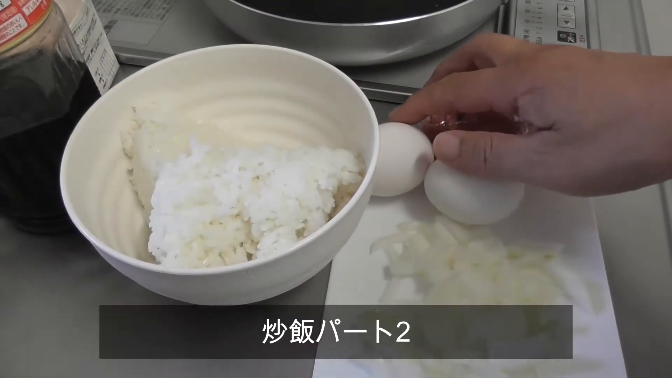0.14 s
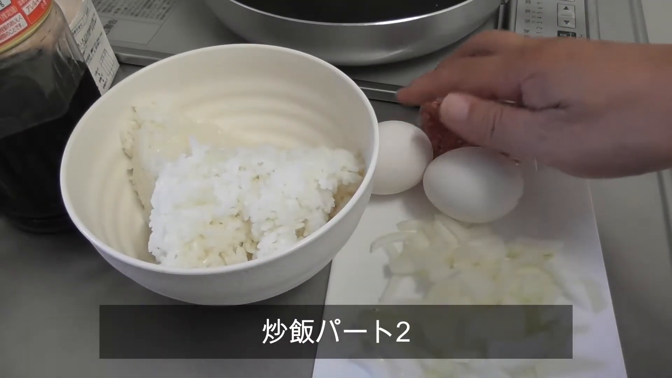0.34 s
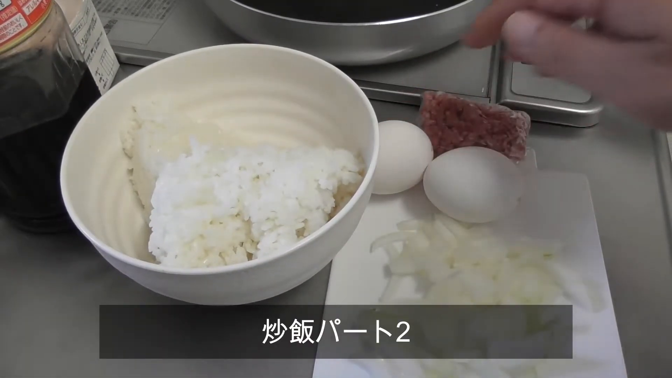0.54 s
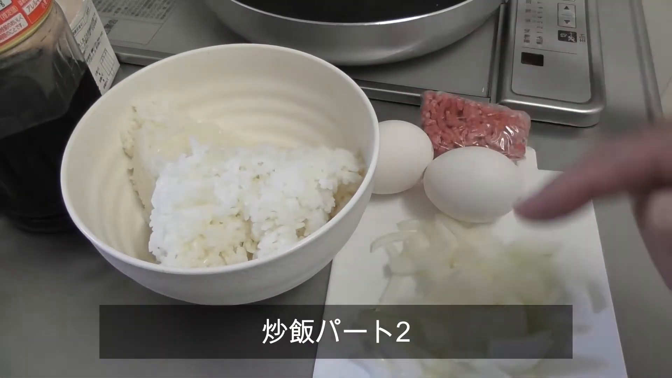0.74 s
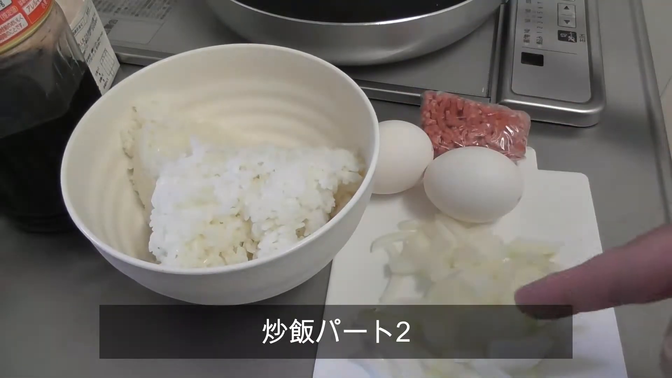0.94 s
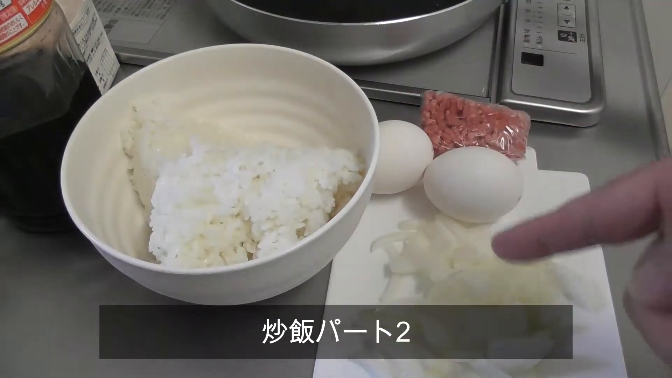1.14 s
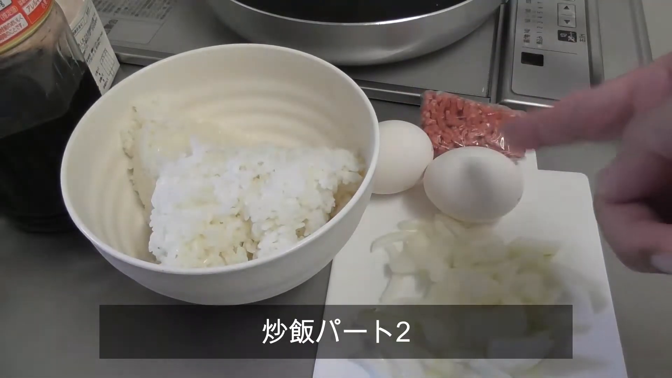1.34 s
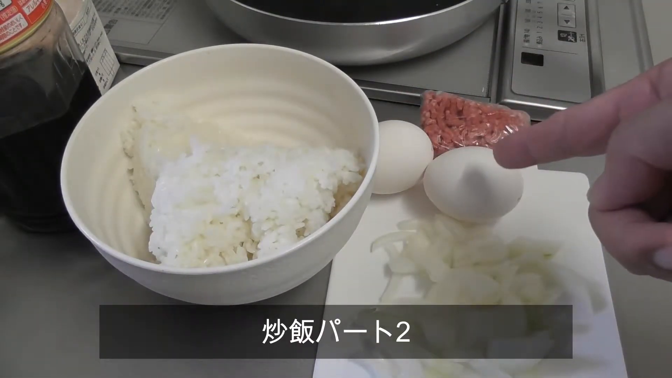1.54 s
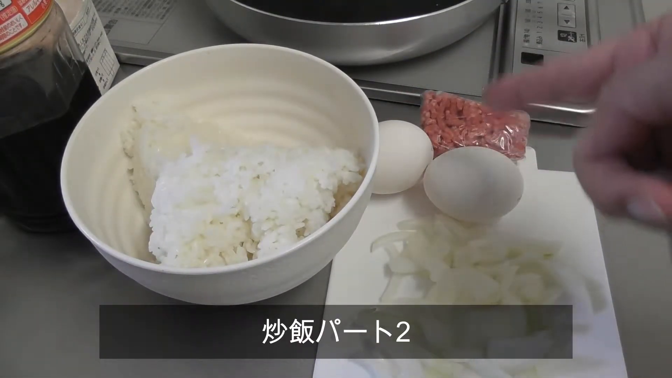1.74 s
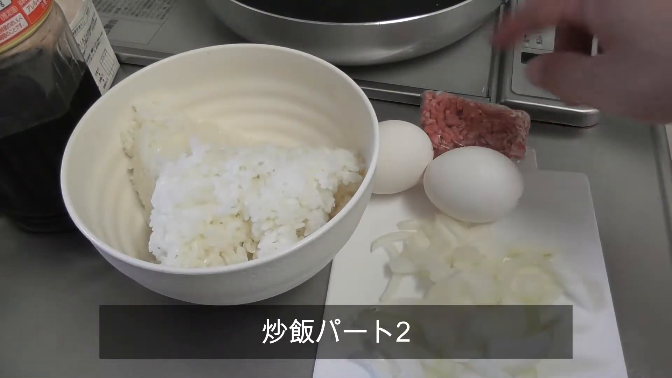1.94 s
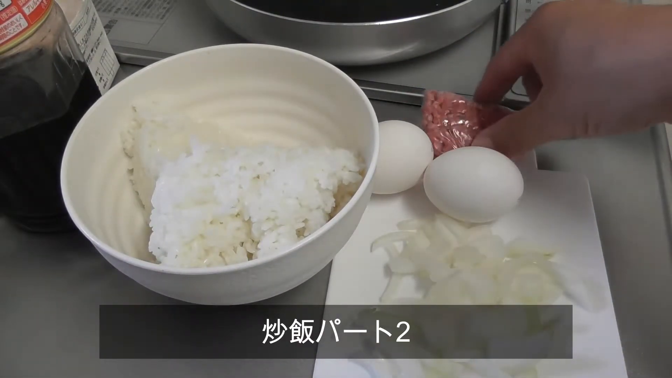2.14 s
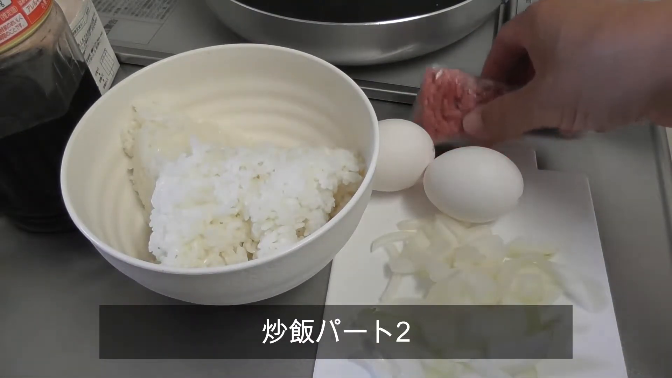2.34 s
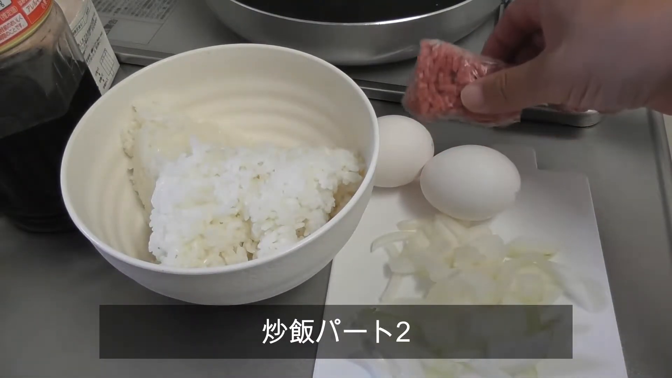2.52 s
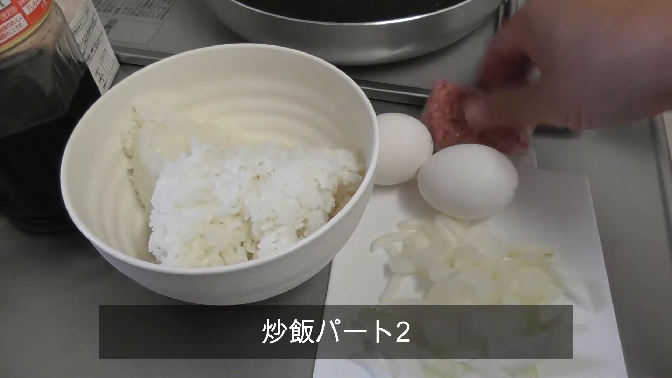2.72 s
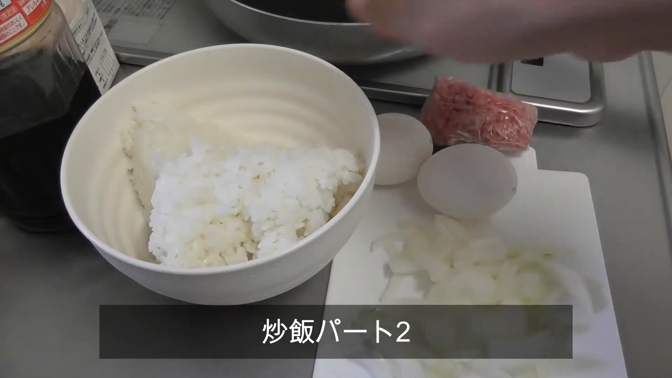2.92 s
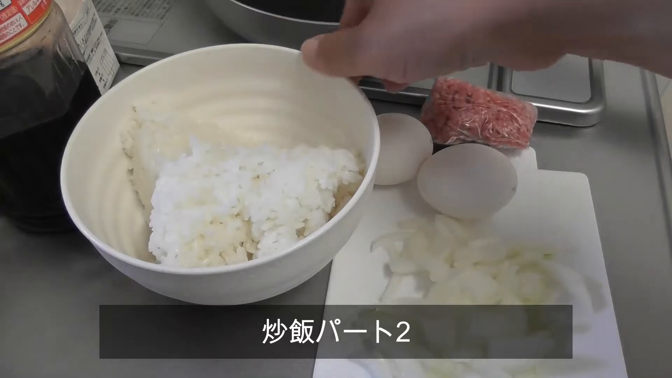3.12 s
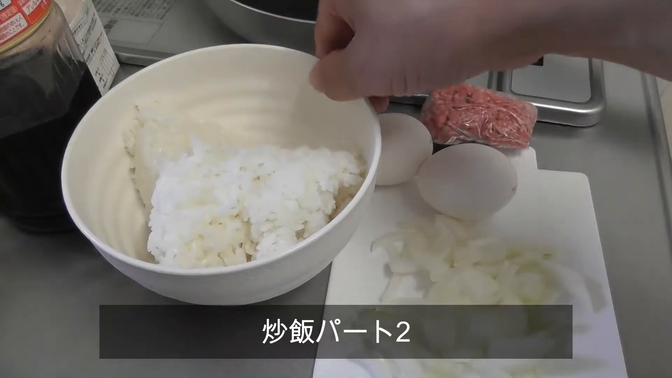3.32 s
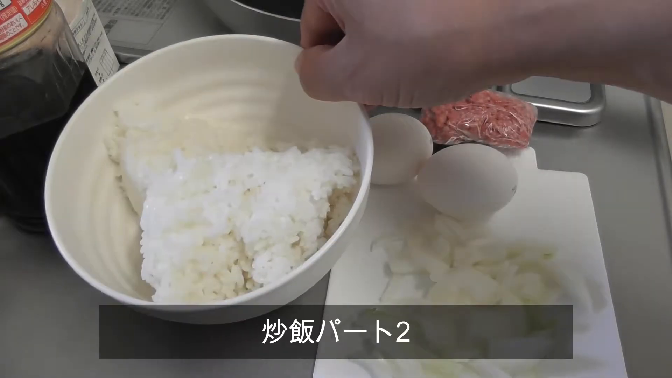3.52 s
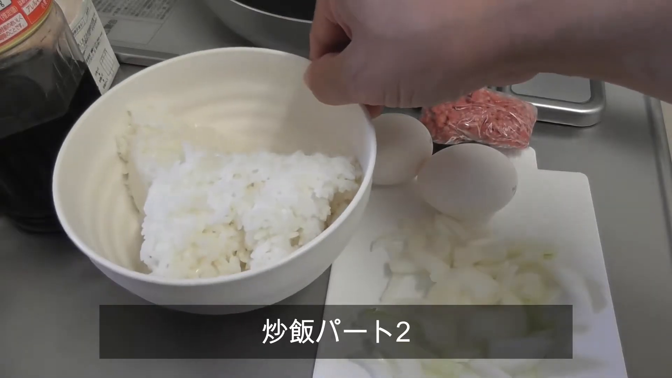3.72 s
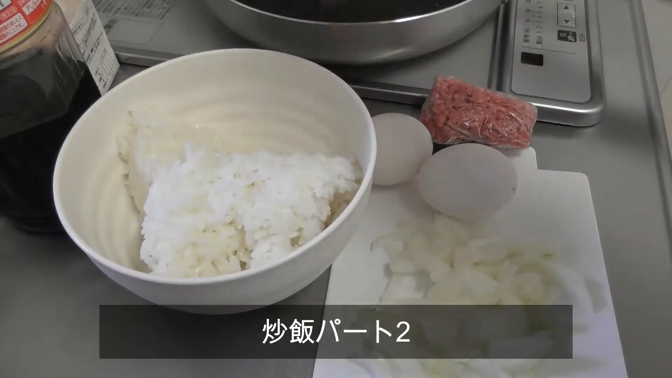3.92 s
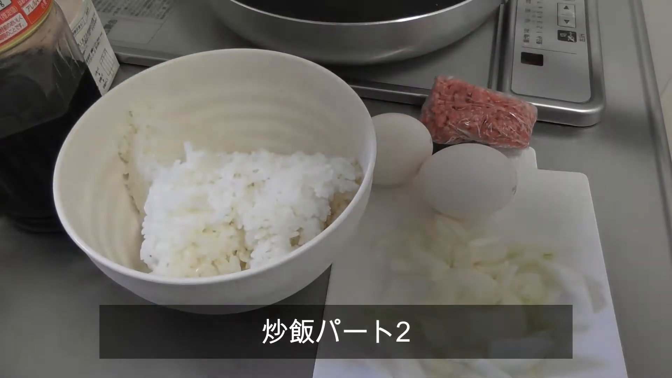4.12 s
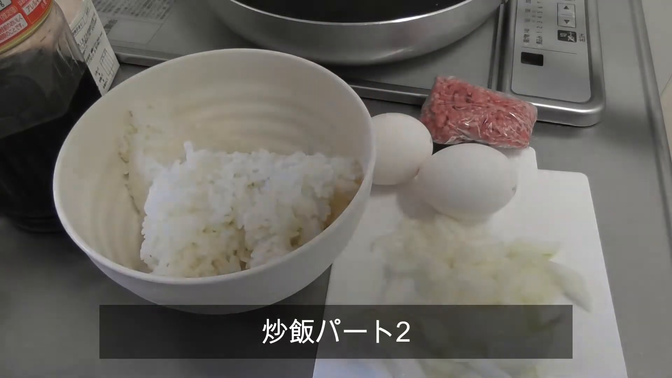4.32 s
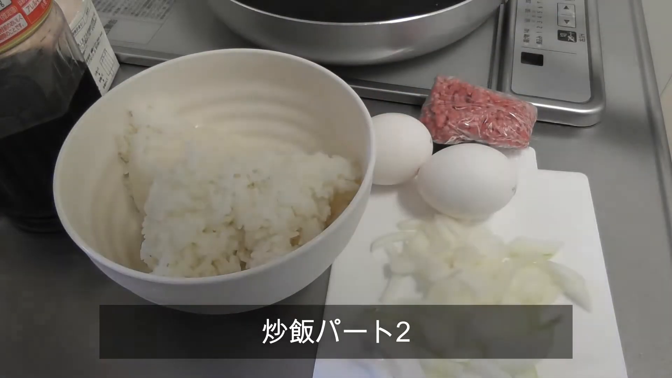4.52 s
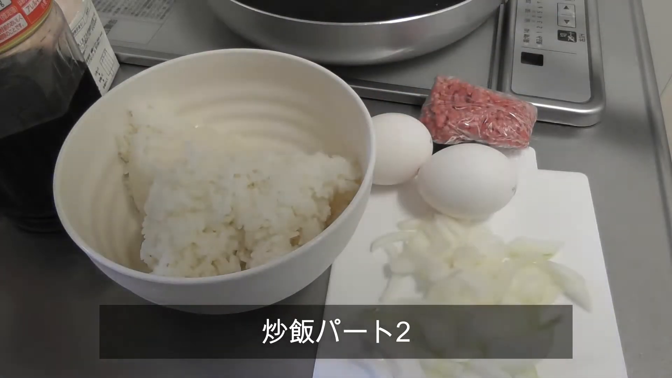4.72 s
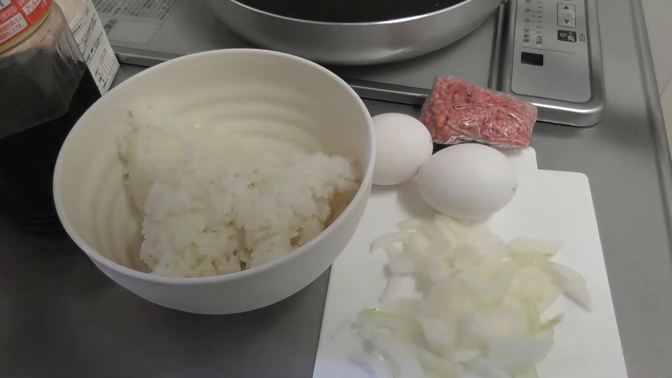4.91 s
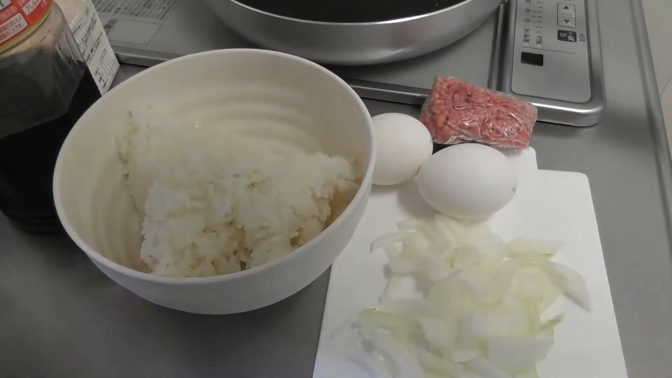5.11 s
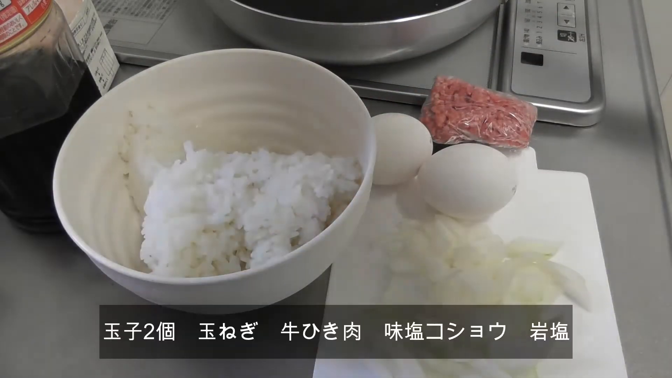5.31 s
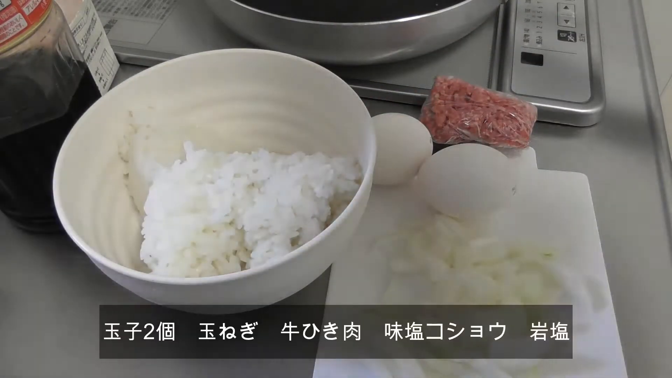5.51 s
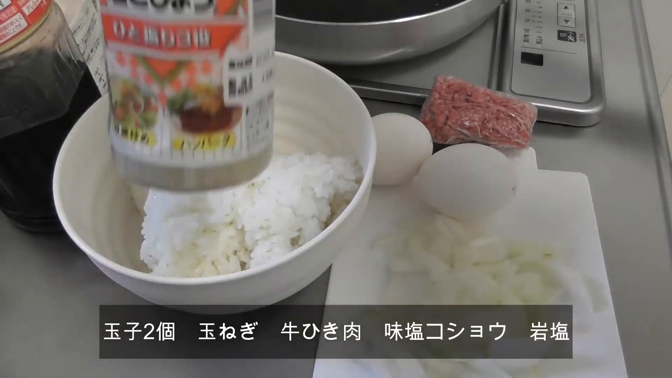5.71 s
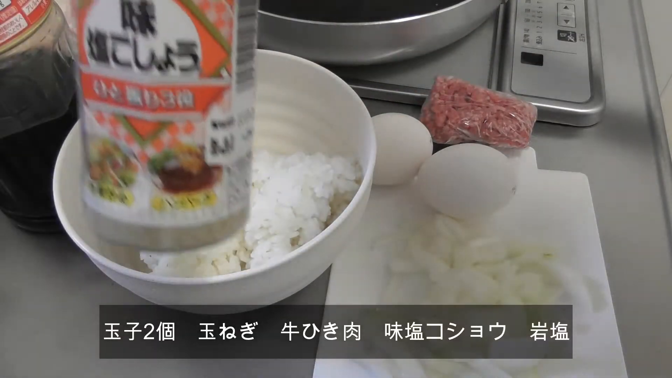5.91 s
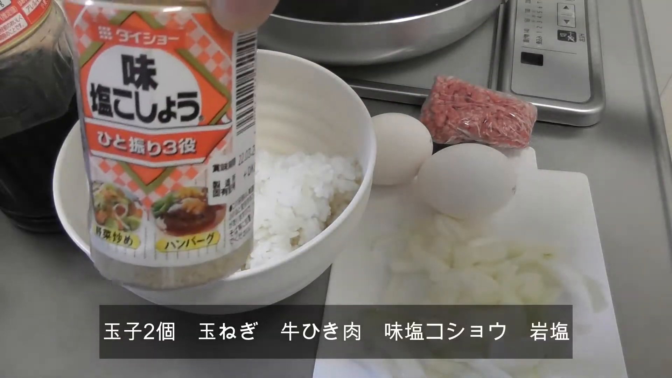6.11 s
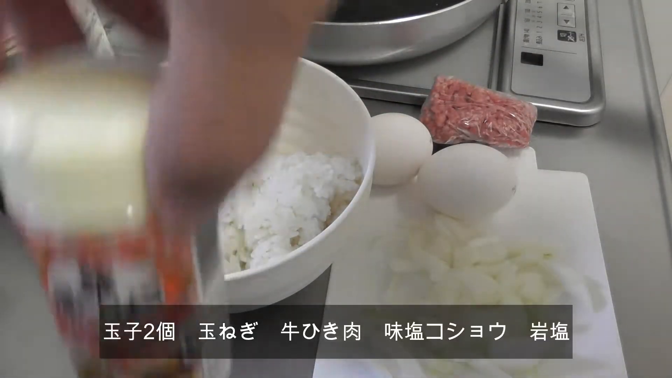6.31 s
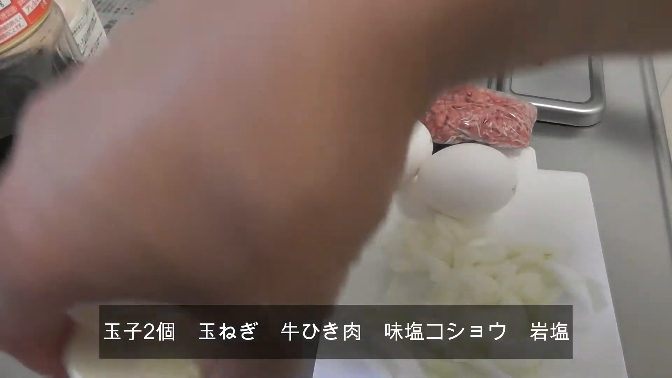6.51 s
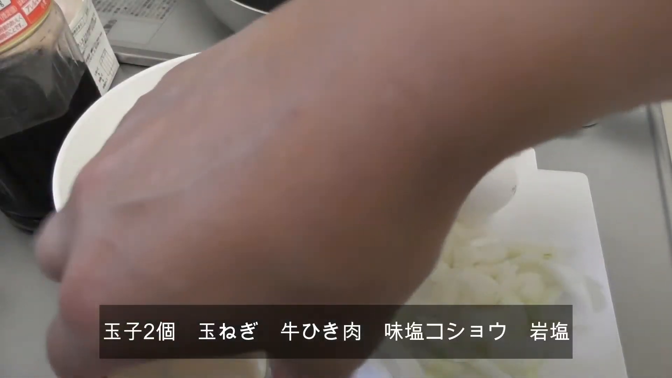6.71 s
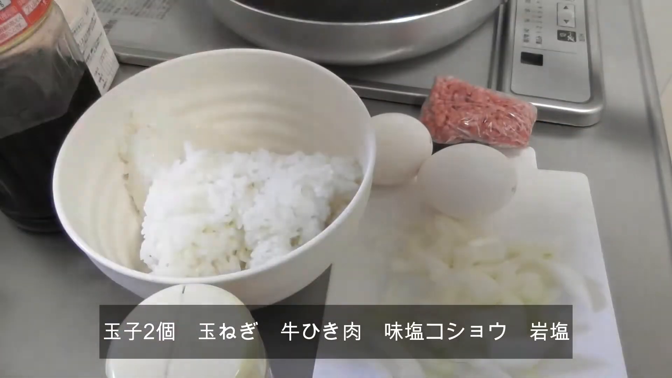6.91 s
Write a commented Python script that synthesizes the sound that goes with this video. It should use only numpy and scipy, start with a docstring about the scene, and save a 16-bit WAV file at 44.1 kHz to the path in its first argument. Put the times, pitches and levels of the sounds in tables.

```python
"""At a steel kitchen counter in a small room, a hand lifts and drops a film-wrapped pack, tips and sets down a bowl,
drags a plastic shaker off the counter and knocks it down again near the microphone.
Knocks and drags make the bowl and counter ring; friction is shaped noise; film and snaps are short bursts.
Behind them are the steady tones of two appliance motors, faint whines and the shaped noise of the air."""
import sys
import numpy as np
from scipy import signal
from scipy.fft import rfft, irfft
from scipy.io import wavfile

SR = 44100
rng = np.random.default_rng(int(sys.argv[2]) if len(sys.argv) > 2 else 0)


def persist_wave(psi):
    """Save psi, clipped to +-1, as 16-bit WAV."""
    counts = np.round(np.clip(psi, -1, 1) * 32767).astype(np.int16)
    wavfile.write(sys.argv[1], SR, np.atleast_2d(counts).T)


N = 306539

# ways the counter top rings when nothing damps it: (pitch [Hz], level [dB], time to fall 60 dB [s])
COUNTER_MODES = [(102.5, 0, 0.14), (125.5, -0.5, 0.071), (180, -20, 0.015), (221, -9, 0.11),
                 (275, -26.5, 0.29), (298.6, 1, 0.028), (353, -6.5, 0.077), (460.6, -6, 0.11),
                 (486, -1, 0.037), (625, -3.5, 0.037), (719.5, -10.5, 0.099), (855, -7, 0.053),
                 (950, -13, 0.12), (1068.5, -8, 0.062), (1270, -10, 0.053), (1457, -8.5, 0.028),
                 (1860, -17.5, 0.038)]
ROOM_DB = -14   # echoes against the direct sound


def amp(db):
    """Turn decibels into a gain."""
    return 10 ** (np.asarray(db, float) / 20)


def rms_one(x):
    """Scale a sound to an average (rms) strength of 1."""
    return x / np.sqrt(np.mean(x ** 2) + 1e-20)


def colour(x, points):
    """Filter a sound to a curve of (pitch [Hz], gain [dB]), responding as early as possible (minimum phase)."""
    points = np.array(points)
    hz = np.maximum(np.arange(4097) * SR / 8192, 1)
    db = np.interp(np.log(hz), np.log(points[:, 0]), points[:, 1])
    # folding the cepstrum (spectrum of the log gain) forward makes the response minimum phase
    cepstrum = irfft(np.log(amp(db)))
    cepstrum[1:4096] *= 2
    kernel = irfft(np.exp(rfft(cepstrum[:4097], 8192)))
    return signal.oaconvolve(x, kernel[:3000])[:len(x)]


def drift(rate):
    """A slow random curve: straight lines between random points, rate points per second (at most 39)."""
    knots = rng.standard_normal(int(N / SR * 40) + 2)
    return np.interp(np.arange(N) / SR * min(rate, 39), np.arange(len(knots)), knots)


def ring(clicks, hz, t60):
    """A resonance: each click starts a sine of its own height that falls 60 dB in t60 seconds."""
    r = amp(-60 / (t60 * SR))
    w = 2 * np.pi * hz / SR
    return signal.lfilter([0, np.sin(w)], [1, -2 * r * np.cos(w), r * r], clicks + 1e-18)


def drive_db(mode_hz, contact_hz, below=3.3, above=3.16):
    """A contact drives modes less the farther they lie from its own pitch (dB per octave squared)."""
    octaves = np.log2(mode_hz / contact_hz)
    return -np.where(octaves > 0, above, below) * octaves ** 2


def burst(hz, t60, noise, width=0.85):
    """A sharp edge and a short dying rattle around one pitch, peak 1; width is in octaves to each side."""
    hz = np.clip(hz, 500, 14000)
    band = signal.butter(1, [hz / 2 ** width, min(hz * 2 ** width, .45 * SR)], "band", fs=SR)
    rattle = 0.47 * noise * amp(-60 * np.arange(len(noise)) / SR / max(t60, .002))
    rattle[0] = 1   # the sharp edge
    x = signal.lfilter(*band, rattle)
    return x / np.abs(x).max()


def add(track, sound, s):
    """Mix a sound into a track at time s."""
    i = round(s * SR)
    track[i:i + len(sound)] += sound[:N - i]


def strokes(table, rise, fall):
    """Strokes rise, hold and fall in dB per second; the loudest one sets the level and the extra columns."""
    start, length, db, *columns = np.transpose(table)
    t = np.arange(N)[:, None] / SR
    early = np.maximum(start - t, 0)
    late = np.maximum(t - start - length, 0)
    levels = db - rise * early - fall * late
    loudest = levels.argmax(axis=1)
    return np.maximum(levels.max(axis=1), -99), *[c[loudest] for c in columns]


def soften(x, low_hz=85, high_hz=2500):
    """A small body radiates no deep bass, and a contact of finite length no treble."""
    return signal.sosfilt(signal.butter(2, [low_hz, high_hz], "band", fs=SR, output="sos"), x)


def air():
    """The air of the room is steady noise, drawn separately for mid (both sides alike) and side (difference)."""
    # shape of the air noise: (pitch [Hz], relative level per Hz [dB])
    air_colour = [(20, -14.5), (40, 3.5), (70, -14.5), (110, 4.5), (175, -7), (300, 2), (450, -3),
                  (800, -5), (1100, -10), (1500, -22), (3000, -29), (6000, -28.5), (10000, -23.5),
                  (16500, -15)]
    return [amp(-56.5) * rms_one(colour(rng.standard_normal(N), air_colour)) for _ in range(2)]


def whines():
    """Faint steady whines: noise through narrow resonances."""
    # (pitch [Hz], width [Hz], rms level [dB])
    whine_lines = [(2007, 10, -90), (3400, 13, -85.5), (3894, 10, -90.5), (4030, 10, -96),
                   (4140, 11, -86.5), (3900, 300, -89)]
    noise = rng.standard_normal(N)
    # a narrower resonance rings longer
    return sum(amp(db) * rms_one(ring(noise, hz, 2.2 / width)) for hz, width, db in whine_lines)


def motors():
    """Two motors hum at whole multiples of their turning rates, each tone wavering a little in level."""
    slow_motor_hz, fast_motor_hz = 39.31, 49.3   # turns per second
    # tones of the slow motor: (multiple of the turning rate, middle rms level [dB])
    slow_orders = [(3, -82.5), (5, -70), (8, -66.5), (10, -66.5), (11, -68.5), (12, -60), (13, -74.5),
                   (14, -85), (16, -88), (20, -86), (24, -76)]
    # tones of the fast motor: (multiple of the turning rate, middle rms level [dB])
    fast_orders = [(1, -70), (2, -73), (4, -69), (5, -95), (6, -62.5), (8, -69.5), (12, -73), (13, -76),
                   (14, -72), (15, -79.5), (23, -81)]
    t = np.arange(N) / SR
    lines = [(k * slow_motor_hz, db) for k, db in slow_orders]
    lines += [(k * fast_motor_hz, db) for k, db in fast_orders]
    hum = 0
    for hz, db in lines:
        level = np.sqrt(2) * amp(db + 1.92 * drift(2.895))
        hum = hum + level * np.exp(2j * np.pi * (hz * t + rng.random()))
    return hum.real, hum.imag   # mid and side, a quarter turn apart


def room(x):
    """Echoes of the room: noise that dies away at its own speed in each octave, after a short gap."""
    # how long the echoes last: (pitch [Hz], time to fall 60 dB [s])
    decay = np.array([(60, 0.33), (250, 0.45), (1000, 0.32), (3000, 0.25), (8000, 0.14), (16000, 0.11)])
    t = np.arange(int(.6 * SR)) / SR
    tail = 0
    for hz in 45 * 2.0 ** np.arange(9):
        band = signal.butter(2, [hz, min(2 * hz, .45 * SR)], "band", fs=SR, output="sos")
        t60 = np.interp(np.log(np.sqrt(2) * hz), np.log(decay[:, 0]), decay[:, 1])
        tail = tail + signal.sosfilt(band, rng.standard_normal(len(t))) * amp(-60 * t / t60)
    tail = signal.lfilter(*signal.butter(1, 450, "high", fs=SR), tail)   # the echoes carry little bass
    tail = tail * np.clip((t - .003) / 0.002, 0, 1)   # 3 ms gap, then a 2 ms fade-in
    return signal.oaconvolve(x, tail / np.sqrt(np.sum(tail ** 2)))[:N]


def ticking():
    """A faint ticking as the shaker settles: evenly spaced clicks into one short resonance."""
    # (start [s], end [s], click level [dB], pitch [Hz])
    start, end, db, hz = (6.812, 6.925, -57, 2700)
    period_s = .0165
    clicks = np.zeros(N)
    clicks[(np.arange(start, end, period_s) * SR).astype(int)] = amp(db)
    return ring(clicks, hz, 0.0075)


def rub():
    """Skin and sleeve slide on surfaces: smooth friction hiss, with more lower part at firmer contact."""
    # one row a stroke: (start [s], length [s], hiss level [dB], lower part against the hiss [dB])
    rub_strokes = [(0, 0.14, -55, 1.5), (0.364, 0.17, -66.5, -7), (0.557, 0.28, -65, -6),
                   (1.86, .25, -73, 2.5), (2.551, 0.038, -66, 3), (2.698, 0.089, -61, 3),
                   (2.967, 0.085, -64.5, -0.5), (3.286, 0.0082, -68, -14), (3.365, .01, -71, 5),
                   (3.558, 0.023, -52, 3), (3.713, .02, -65, 4), (3.83, 0.071, -64.5, -1),
                   (4.0, 0.13, -65.5, -1), (4.197, 0.18, -63, 4), (4.626, 0.016, -63.5, 5),
                   (4.787, 0.011, -56.5, 9.5), (4.815, .01, -57, 5.5), (4.83, .01, -50, 2),
                   (4.838, 0.006, -46.5, 7.5), (5.045, 0.018, -67, 4), (6.174, 0.025, -67, -15),
                   (6.219, 0.014, -57.5, 5), (6.466, 0.13, -73, 12), (6.68, 0.088, -69, 5),
                   (6.77, 0.014, -60, 1.5), (6.85, .1, -75, 8)]
    # shape of the hiss: (pitch [Hz], relative level per Hz [dB])
    hiss_colour = [(800, 11), (1500, -6), (3000, -0.5), (5000, 2), (7500, 5.5), (11000, -2.5), (16500, -12)]
    rise = 60 / np.array(rub_strokes)[:, 1]   # dB per second: a long stroke swells in more slowly
    hiss_db, lower_db = strokes(rub_strokes, rise, 189)
    hiss = rms_one(colour(rng.standard_normal(N), hiss_colour))
    lower = signal.sosfilt(signal.butter(3, 4800, fs=SR, output="sos"), hiss)
    level = amp(hiss_db + 1.0 * drift(25.0) + 1.4 * drift(6.3))   # the strength wavers
    return level * (hiss - lower + amp(lower_db) * rms_one(lower))


def film():
    """Fingers squeeze the film: creases give way at random, in clumps, most of them small, each a short rattle."""
    # one row a squeeze: (start [s], length [s], crackle level [dB])
    squeezes = [(0, 0.18, -58.5), (.345, 0.15, -72.5), (2.12, 0.069, -59.5), (2.185, .015, -51.5),
                (2.2, 0.016, -45.5), (2.262, .02, -49), (2.285, 0.022, -40.5), (2.325, 0.012, -47),
                (2.36, 0.021, -46), (2.42, .02, -54), (2.47, 0.022, -60.5), (2.719, .008, -54),
                (2.732, 0.011, -39.5), (2.775, .11, -53.5)]
    # shape given to the crackle: (pitch [Hz], gain [dB])
    film_colour = [(500, -61), (1200, 4), (2500, 3), (4500, 4), (8000, 12), (12000, 11.5), (16500, 17.5)]
    creases_per_s = 2000   # before the clumping raises and lowers it
    level_db, = strokes(squeezes, 3000, 330)
    sizes = amp(2.7 * np.minimum(rng.exponential(1, N), 4)) * rng.choice([-1, 1], N)
    creases = sizes * (rng.random(N) < creases_per_s * amp(4.0 * drift(38.0)) / SR)
    # each crease is dealt one of twelve rattles of different pitch
    dealt = rng.integers(0, 12, N)
    crackle = 0
    for k, hz in enumerate(np.geomspace(1500, 14000, 12)):
        rattle = burst(hz, .004, rng.standard_normal(300))
        crackle = crackle + signal.oaconvolve(creases * (dealt == k), rattle)[:N]
    return amp(level_db) * rms_one(colour(crackle, film_colour))


def snaps():
    """Single creases, nails and rims: short bursts, each with its own pitch."""
    # (time [s], peak level [dB], centre pitch [Hz])
    snap_times = [(0.2867, -48.5, 8150), (0.3035, -56, 8800), (0.414, -37.5, 7740), (0.4292, -42, 7390),
                  (0.446, -35, 5900), (0.4645, -41.5, 6600), (0.4744, -48, 7450), (1.362, -53, 3500),
                  (2.127, -48, 8200), (2.1454, -32, 8000), (2.1661, -31, 7800), (2.1712, -31, 8600),
                  (2.1939, -39, 8000), (2.2127, -25, 7100), (2.2587, -27, 4100), (2.282, -34.5, 6480),
                  (2.291, -33, 5000), (2.303, -23, 6160), (2.3114, -41, 6000), (2.3224, -39, 7940),
                  (2.3395, -40, 7810), (2.3906, -33, 7500), (2.401, -36, 8000), (2.4155, -22, 9400),
                  (2.422, -45, 5000), (2.452, -48, 7200), (2.4662, -28, 8700), (2.4822, -37, 7770),
                  (2.538, -48, 9360), (2.7217, -39.5, 3800), (2.7326, -16.5, 8950), (2.736, -17.5, 8500),
                  (2.745, -35, 7300), (2.7674, -28, 7530), (2.836, -40, 6060), (2.8704, -49, 7530),
                  (2.9294, -32.5, 6600), (3.035, -39.5, 8100), (3.1788, -49, 8140), (3.8809, -48, 7660),
                  (4.035, -52, 3400), (4.6417, -52, 7780), (4.773, -43, 7610), (4.8477, -24.5, 8100),
                  (5.736, -62, 3890), (6.745, -48, 6500), (6.7577, -42, 7600)]
    out = np.zeros(N)
    for (s, db, hz), noise in zip(snap_times, rng.standard_normal((len(snap_times), 2000))):
        add(out, amp(db) * burst(hz, .0055, noise), s)
    return out


def squeak():
    """The shaker foot slips: a brief noise heard through two narrow resonances."""
    # (start [s], end [s], first resonance [Hz], second resonance [Hz])
    start, end, *resonances_hz = (6.768, 6.798, 4500, 7200)
    t = np.arange(N) / SR
    slip = rng.standard_normal(N) * np.clip(np.minimum(t - start, end - t) / 0.0034, 0, 1)
    return amp(-77.5) * sum(ring(slip, hz, .016) for hz in resonances_hz)


def drag():
    """Pack, bowl and shaker slide: dense uneven contacts ring the counter, damped by the hand."""
    # one row a drag: (start [s], length [s], level [dB], pitch that the contact drives best [Hz])
    drag_strokes = [(0, .05, -53.5, 238), (.09, .09, -58, 300), (.305, 0.056, -56, 248),
                    (2.341, 0.021, -48.5, 810), (3.556, .004, -45, 814), (3.61, 0.11, -52, 220),
                    (4.775, .008, -42, 348), (4.79, 0.038, -35, 342), (4.828, 0.028, -31, 338),
                    (4.86, 0.038, -37, 550), (4.915, .02, -42, 300), (6.208, 0.0032, -51, 900)]
    level_db, contact_hz = strokes(drag_strokes, 4000, 400)
    at = np.flatnonzero(rng.random(N) < .03)   # the samples where a contact falls
    sizes = amp(level_db[at]) * rng.standard_normal(len(at))
    body = 0
    for k, (hz, db, t60) in enumerate(COUNTER_MODES):
        contacts = np.zeros(N)
        contacts[at] = sizes * amp(db + drive_db(hz, contact_hz[at]))
        body = body + (-1) ** k * ring(contacts, hz, 0.58 * t60)   # the hand shortens the ring
    return soften(body)


def blows(table, modes, crack_hz):
    """Each blow is a crack, a damped thud of the object in the hand, and the ring of the body's modes."""
    ring_db, clack_db = -4.5, -5.5   # modes against the blow level; clack against the crack
    thud_cycles = 19.4   # cycles until the thud has fallen 60 dB
    s, peak_db, contact_hz = np.transpose(table)[:3]
    at = np.round(s * SR).astype(int)
    body, cracks = np.zeros(N), np.zeros(N)
    spread_db = 1.5 * rng.standard_normal((len(s), len(modes)))   # no two blows ring quite alike
    for k, (hz, db, t60) in enumerate(modes):
        clicks = np.zeros(N)
        clicks[at] = amp(peak_db + ring_db + db + drive_db(hz, contact_hz) + spread_db[:, k])
        body += (-1) ** k * ring(clicks, hz, t60)   # neighbours swing in opposite phase
    click = np.eye(1, 6000)[0]
    for (s, db, hz, crack_db, thud_db), noise in zip(table, rng.standard_normal((len(s), 2000))):
        crack = burst(crack_hz, 0.011, noise, width=0.2)
        clack = burst(2090, 0.036, noise[::-1], width=0.26)   # the wall of the object clacks
        thud = ring(click, hz, thud_cycles / hz)
        add(cracks, amp(db + crack_db) * crack, s)
        add(cracks, amp(db + crack_db + clack_db) * clack, s)
        add(body, amp(db + thud_db) * thud, s)
    return soften(body) + signal.lfilter(*signal.butter(2, 10500, fs=SR), cracks)


def bowl():
    """Knocks that set the bowl ringing in its own modes."""
    # ways the bowl rings: (pitch [Hz], level [dB], time to fall 60 dB [s])
    bowl_modes = [(93.5, 10.5, 0.26), (114, 8.5, 0.18), (294, -9, 0.14), (349, -6.5, 0.085),
                  (443, 1.5, 0.058), (460, -32, 0.26), (477, -12.5, 0.11), (658, -5.5, 0.052),
                  (719, -13, 0.13), (820, -16, 0.18), (892, -34, 0.067), (918, 2.5, 0.034),
                  (1055, 1, 0.044), (1320, -6, 0.022)]
    # (time [s], blow level [dB], pitch driven best [Hz], crack against the blow [dB], thud against the blow [dB])
    bowl_blows = [(3.553, -34.5, 970, -5.5, -1), (3.628, -46, 600, -13, -20), (3.804, -9, 600, -15, -34)]
    return blows(bowl_blows, bowl_modes, 4460)


def counter():
    """Knocks that set the steel counter top ringing in its own modes."""
    # (time [s], blow level [dB], pitch driven best [Hz], crack against the blow [dB], thud against the blow [dB])
    counter_blows = [(0.029, -47, 221, -22, -18), (0.076, -46, 213, -20, 5), (0.303, -41, 297, -13, -7),
                     (2.338, -28, 714, -9, -18), (2.734, -33, 222, -20, -0.5), (2.766, -32.5, 275, -22, -6),
                     (2.788, -45, 403, -22, -1), (4.643, -41.5, 460, -13, -3), (4.787, -18, 309, -28.5, 0),
                     (4.792, -22.5, 723, -36, -2.5), (4.85, -20, 980, -10, 0.5), (4.855, -18, 806, -20, 4),
                     (4.865, -22, 806, -13, -1), (4.879, -26.5, 378, -21, 5), (4.925, -30, 149, -27, 2.5),
                     (4.944, -29.5, 190, -30, -5), (6.208, -46, 700, -4, -8), (6.635, 0, 297.5, -18, 0.5),
                     (6.653, -19, 333, -35, 5.5), (6.687, -17, 222, -43, -2.5), (6.778, -25.5, 285, -32, 4)]
    return blows(counter_blows, COUNTER_MODES, 7900)


def scene():
    """Sources meet two close microphone ports; scattered sound differs between them."""
    # side filter for the background: (pitch [Hz], gain [dB])
    background_width = [(60, -14), (200, -2.5), (400, -6), (800, -7.5), (1600, -15), (3000, -39),
                        (5500, -53), (8000, -7), (12000, -2)]
    # side filter for things close by: (pitch [Hz], gain [dB])
    near_width = [(60, -14), (300, -4), (700, -7.5), (1500, -13.5), (4000, -39), (8000, -16), (12000, -1)]
    near = ticking() + rub() + film() + snaps() + squeak() + drag() + bowl() + counter()
    hum_mid, hum_side = motors()
    air_mid, air_side = air()
    scatter = rng.standard_normal(600) * amp(-60 * np.arange(600) / SR / 0.01)
    # only short waves bend round the housing
    scatter = signal.lfilter(*signal.butter(1, 700, "high", fs=SR), scatter)
    scattered = signal.oaconvolve(near, scatter / np.sqrt(np.sum(scatter ** 2)))[:N]
    # mid is shared by both ports; side is added to one and taken from the other
    mid = near + amp(ROOM_DB) * room(near) + hum_mid + whines() + air_mid
    near_side = amp(3.0) * scattered + amp(ROOM_DB + 1.5) * room(near)
    background_side = amp(-4.0) * hum_side + air_side
    side = colour(near_side, near_width) + colour(background_side, background_width)
    return np.array([mid + side, mid - side])


def record(dry):
    """The microphone adds the colour of its housing, unequal ports, rounded peaks and a steep top cut."""
    # colour of the microphone housing: (pitch [Hz], gain [dB])
    housing = [(1500, 1), (2050, 4), (2800, -1.5), (4100, 4.5), (5200, -4), (6200, 4), (7800, 4),
               (9500, -0.5), (12000, -6.5), (16000, -14)]
    # inequality of the ports: (pitch [Hz], left minus right [dB])
    balance = [(60, 0), (180, -5), (550, 0), (1650, 0.0), (4970, -0.5), (15000, -1)]
    half = np.array(balance) * [1, .5]   # each port takes half of the difference
    left = colour(colour(dry[0], housing), half)
    right = colour(colour(dry[1], housing), half * [1, -1])
    ports = np.array([left, right])
    rounded = ports / (1 + np.abs(ports) ** 4) ** .25
    return signal.sosfilt(signal.cheby2(14, 70, 16700, fs=SR, output="sos"), rounded)   # cut above 16.7 kHz


dry = scene()
out = record(dry)
persist_wave(out)
```